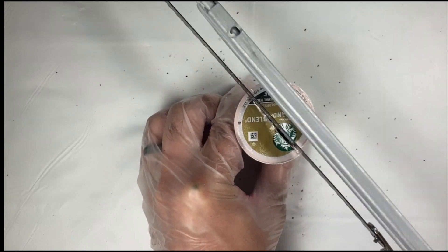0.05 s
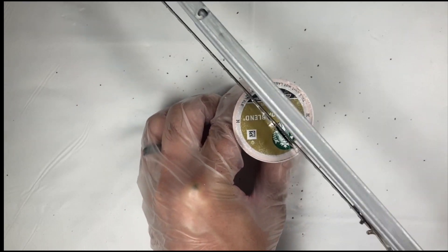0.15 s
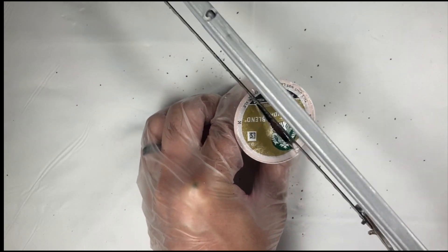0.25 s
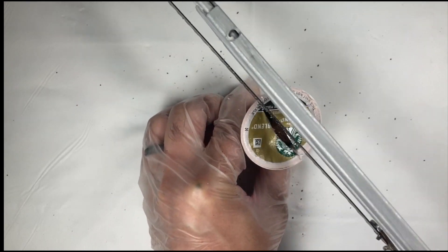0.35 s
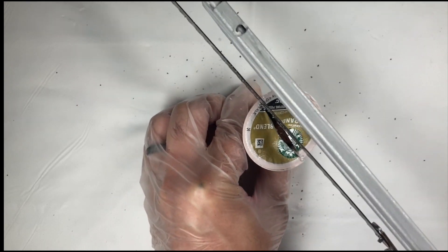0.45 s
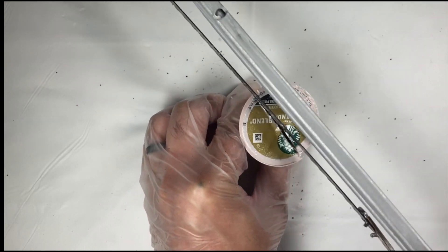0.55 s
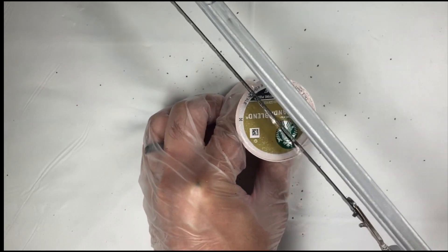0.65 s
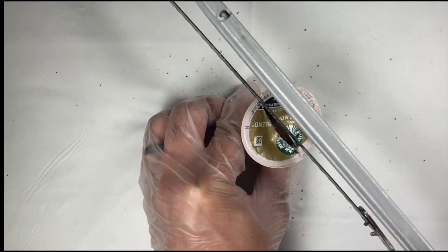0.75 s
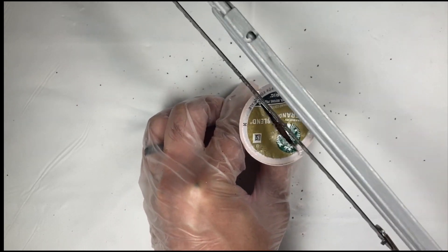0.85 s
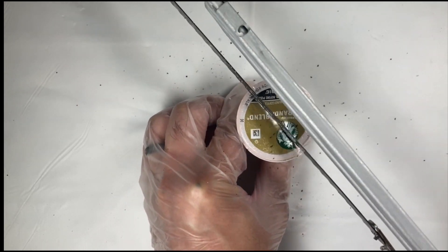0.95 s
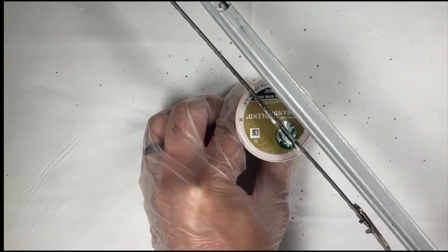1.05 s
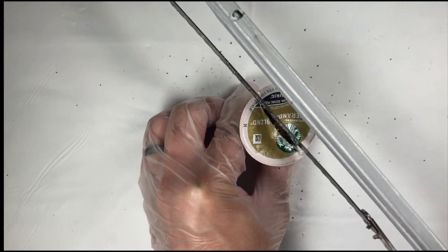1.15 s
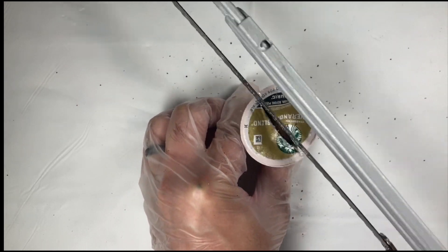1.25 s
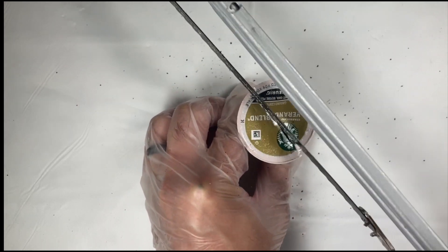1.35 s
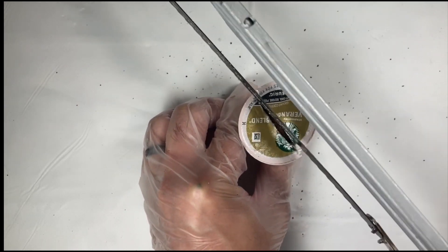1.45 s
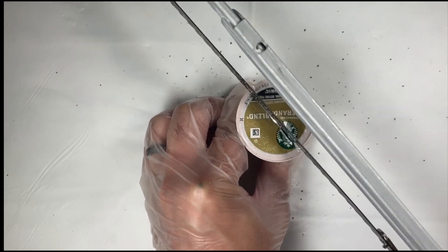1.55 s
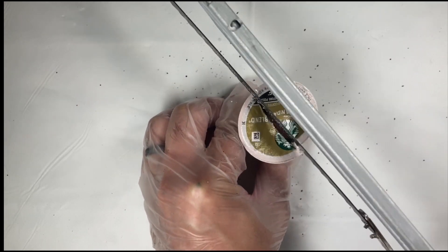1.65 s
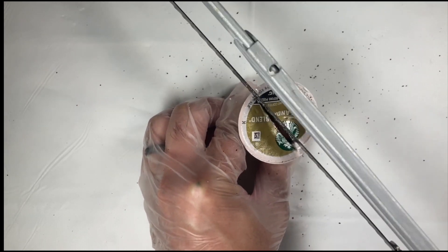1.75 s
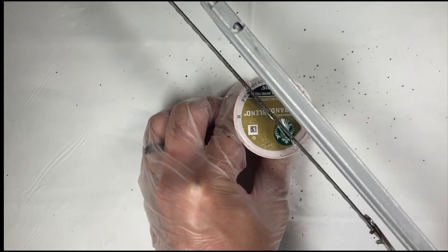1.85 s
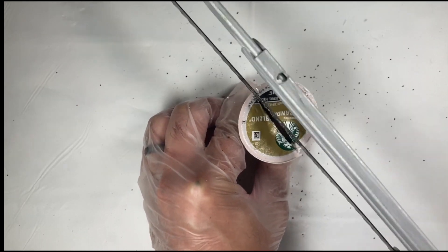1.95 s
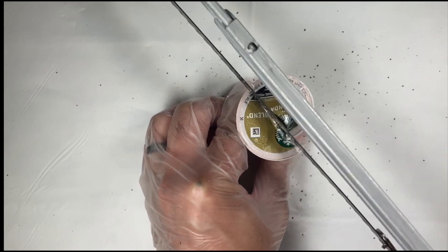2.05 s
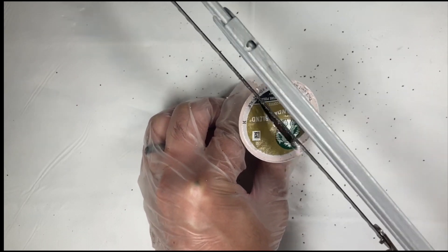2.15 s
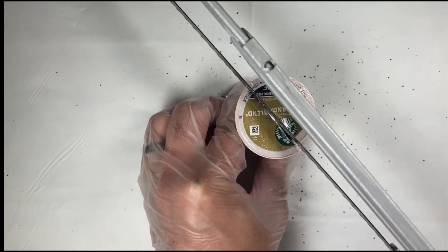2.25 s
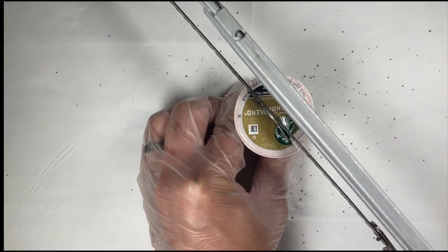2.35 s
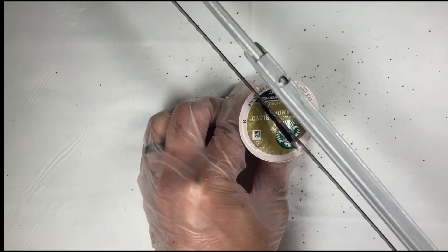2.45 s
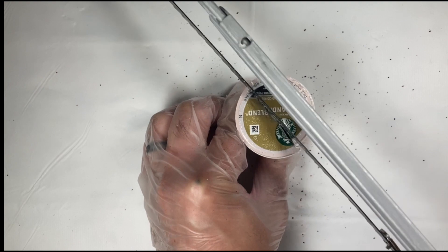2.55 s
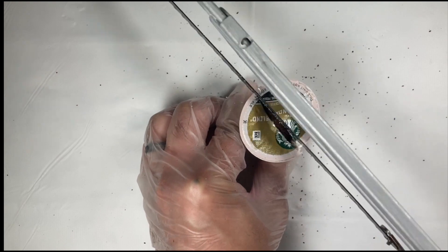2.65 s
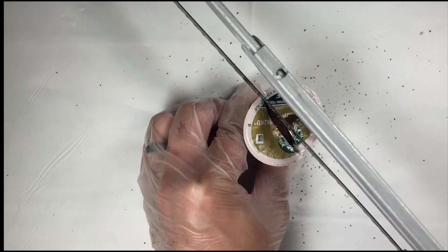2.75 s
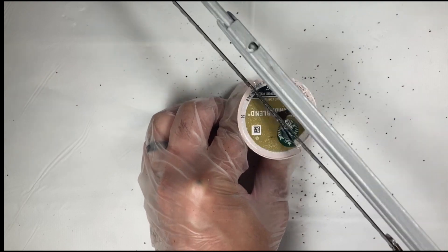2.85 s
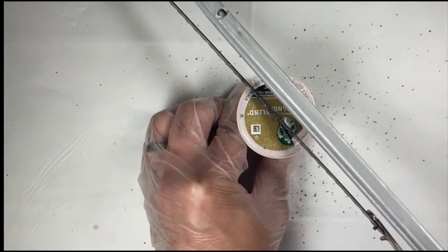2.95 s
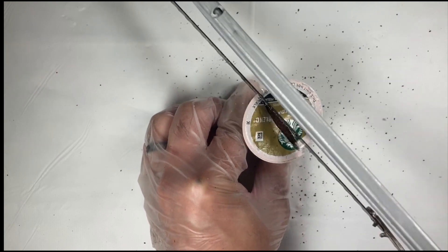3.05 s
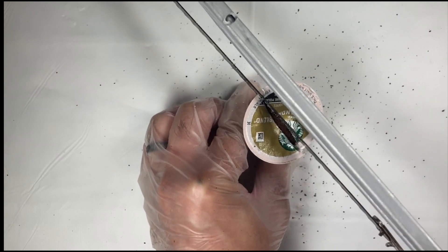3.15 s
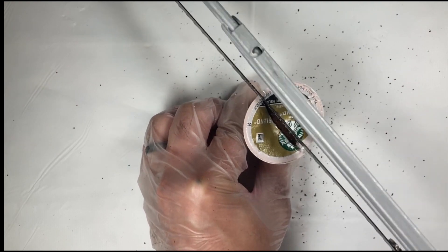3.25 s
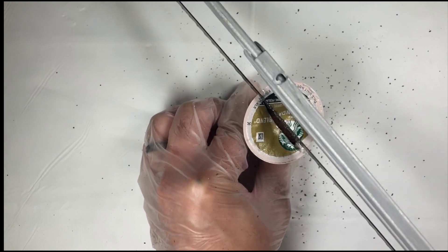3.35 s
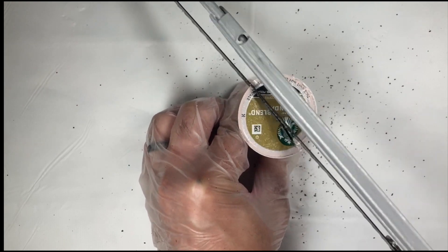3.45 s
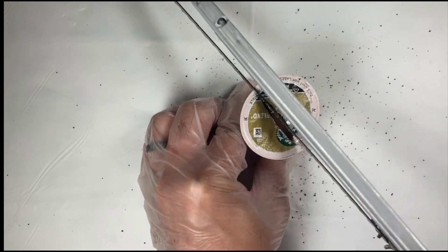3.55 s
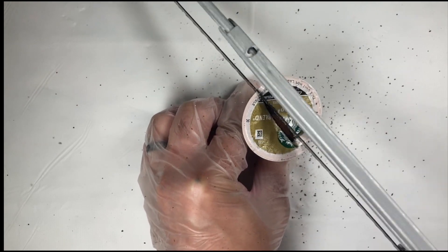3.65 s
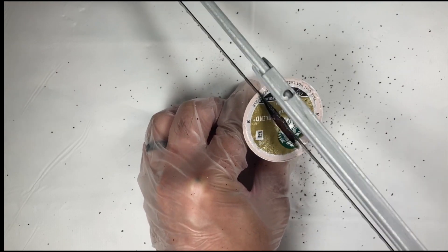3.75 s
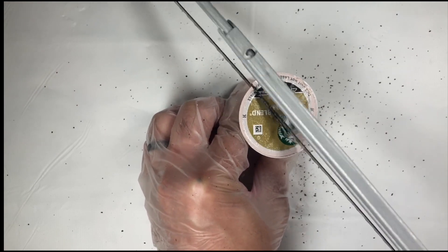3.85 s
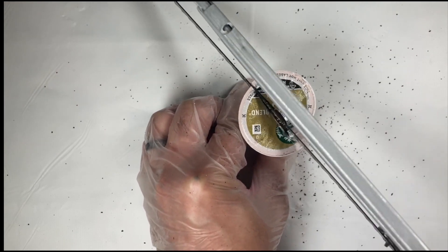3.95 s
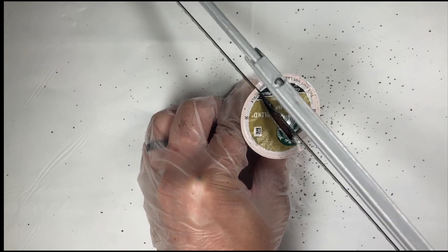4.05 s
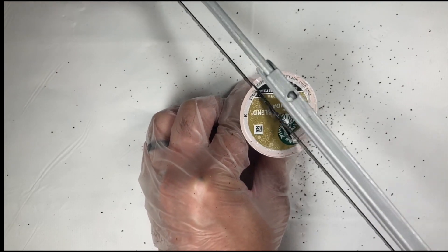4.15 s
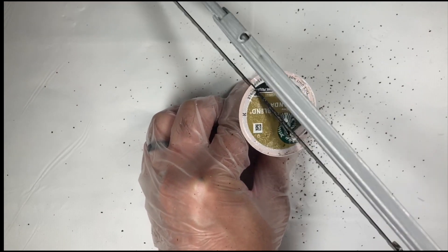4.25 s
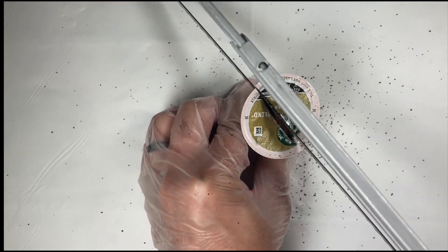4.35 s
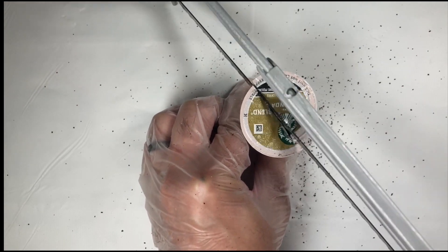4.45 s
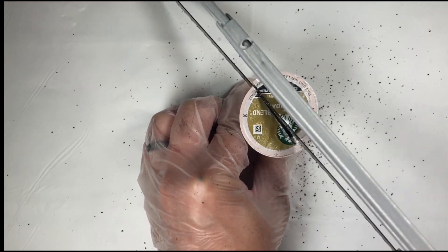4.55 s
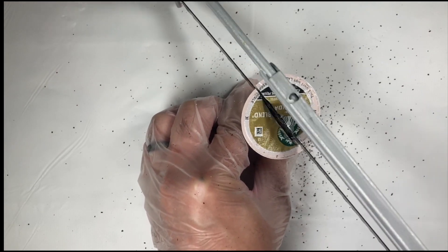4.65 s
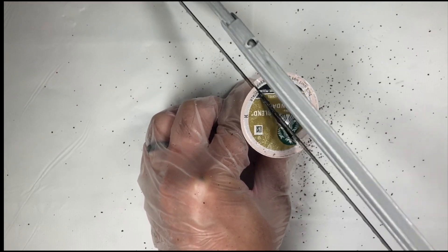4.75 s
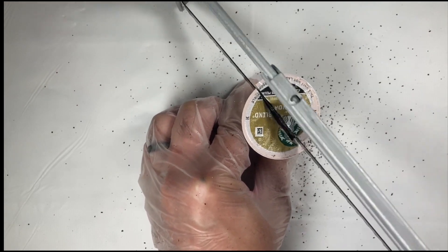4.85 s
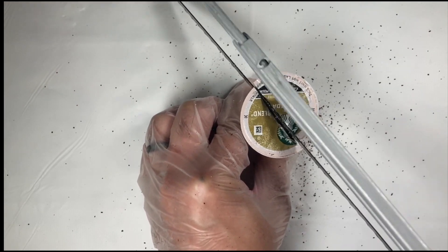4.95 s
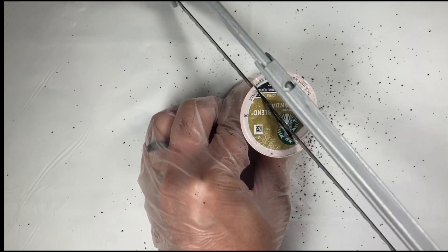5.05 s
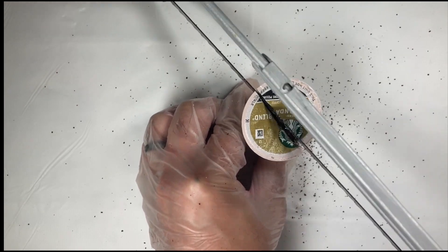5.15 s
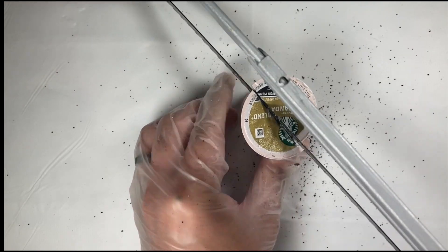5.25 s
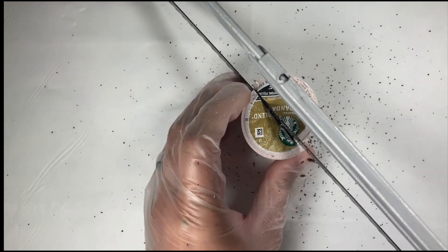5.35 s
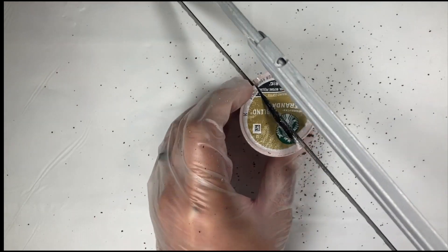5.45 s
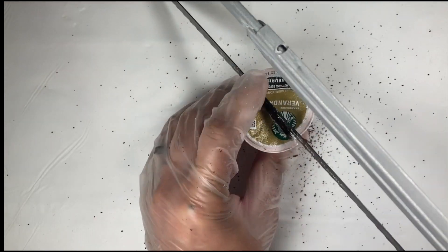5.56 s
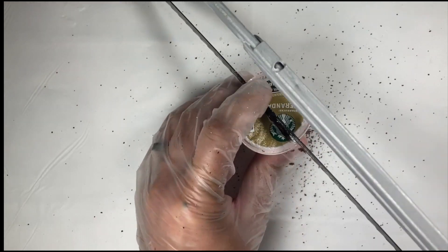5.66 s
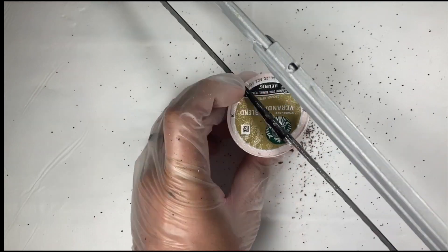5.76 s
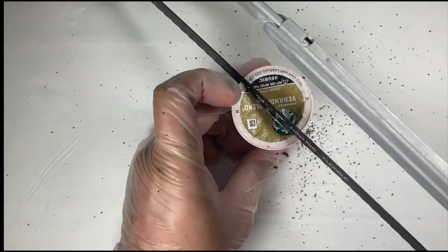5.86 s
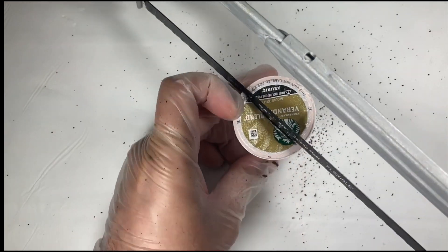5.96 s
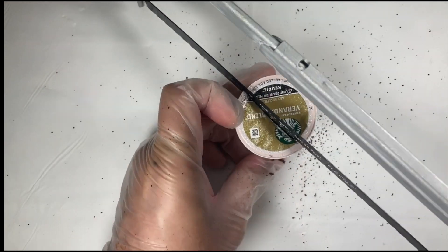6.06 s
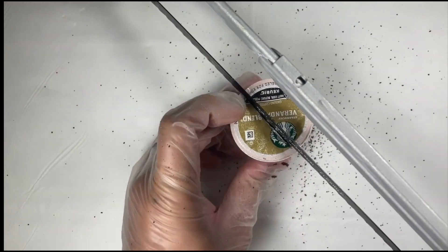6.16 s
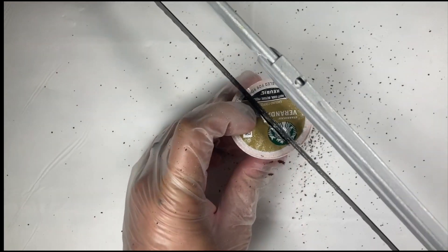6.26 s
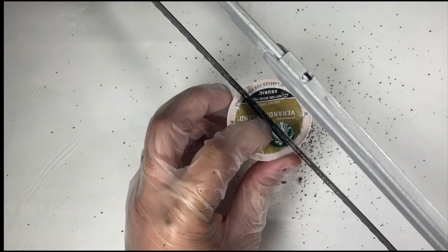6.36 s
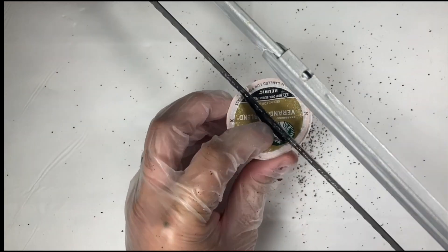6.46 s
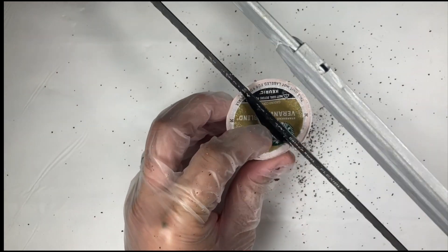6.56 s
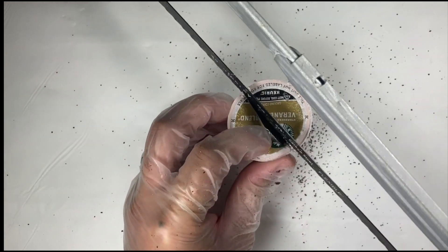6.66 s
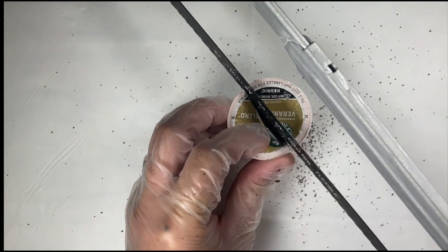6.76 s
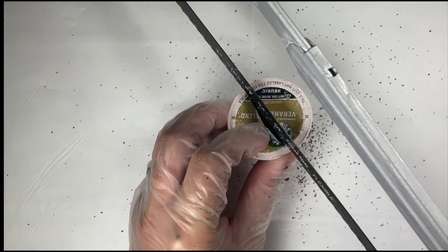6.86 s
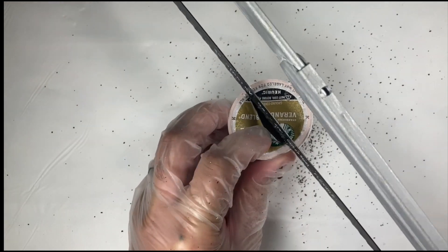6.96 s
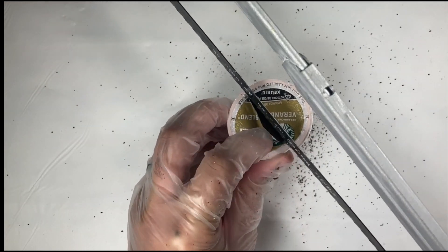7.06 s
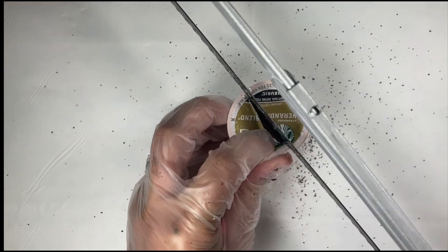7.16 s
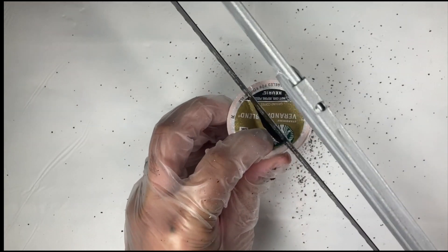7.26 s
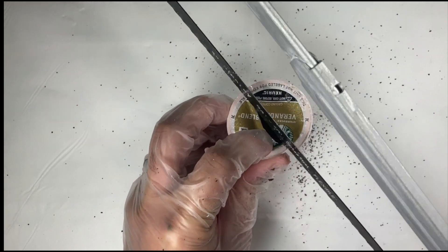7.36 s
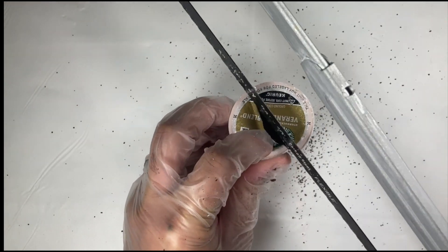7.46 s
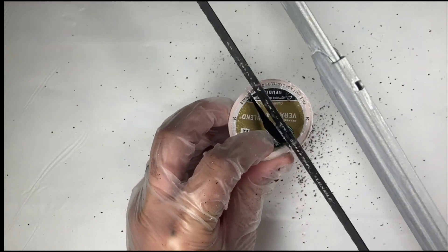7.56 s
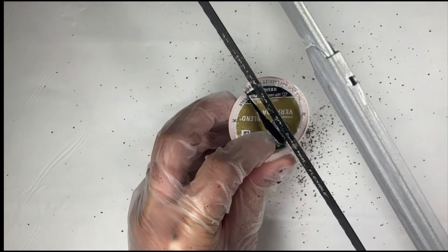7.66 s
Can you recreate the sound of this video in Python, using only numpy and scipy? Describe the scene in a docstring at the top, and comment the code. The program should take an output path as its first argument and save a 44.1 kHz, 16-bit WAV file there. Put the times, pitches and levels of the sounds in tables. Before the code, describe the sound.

Raspy back-and-forth sawing through thin hollow plastic, close stereo microphones, short room echo. It starts with a stuttering drag and low table thumps, then crackling, buzzy strokes about eight a second, full of brittle snaps. After five seconds it ends abruptly; much quieter film-like glove crinkling, a dull knock near six seconds and several tiny blade ticks and scrapes follow over soft room hum.

```python
"""Sawing a coffee pod

A hand hacksaw works back and forth through a small plastic pod of coffee grounds, held on a table by a gloved hand.
Each stroke is a run of tooth ticks over rubbing noise, and now and then a snagged tooth snaps free.
Kicks and short bursts of noise pass through the resonances of cup wall, lid, rim and blade.
After five seconds the sawing stops, the glove shifts its grip with rustling noise,
and the blade is set lightly on the lid again. The table rumbles, and a small room adds echoes, hum and hiss."""
import sys
import numpy as np
from scipy import signal
from scipy.fft import rfft, irfft, next_fast_len
from scipy.io import wavfile
from scipy.ndimage import uniform_filter1d, map_coordinates

SR = 44100
rng = np.random.default_rng(int(sys.argv[2]) if len(sys.argv) > 2 else 0)


def transcribe(signal):
    """Save signal, clipped to [-1, 1], as a 16-bit WAV file at the path in sys.argv[1]."""
    frames = np.atleast_2d(signal).T
    limited = np.clip(frames, -1, 1)
    pcm = np.round(limited * 32767).astype(np.int16)
    wavfile.write(sys.argv[1], SR, pcm)


N = 339570
TIME = np.arange(N) / SR
# frequencies [Hz] at which every filter is drawn
GRID = np.maximum(np.fft.rfftfreq(4096, 1 / SR), 1)

# saw strokes, level before the shares below: (start [s], speeding up [s], slowing down [s], level [dB],
#   tooth catches at top speed [per s], cup wall [dB], lid pitch [Hz], lid [dB], rim pitch [Hz], rim [dB])
STROKES = [(-0.17, 0.25, 0.05, -31.5, 132, 2.5, 1390, 6.5, 2900, -4),
           (0.485, 0.016, 0.092, -33, 185, 5, 800.0, -0.5, 2390, -2),
           (0.72, 0.076, 0.051, -38.5, 158, 0.5, 1280.0, -0.5, 2690.0, -3.0),
           (0.945, 0.039, 0.051, -26.5, 450, 1, 1470.0, 6.5, 3400, 5),
           (1.148, 0.011, 0.02, -38, 270, 9.5, 889.8, -8.5, 2309, 4.5),
           (1.177, 0.026, 0.038, -45, 170, 2.5, 1530.0, 3.5, 3170, -2.5),
           (1.266, 0.027, 0.063, -21.5, 502, 0.5, 800.0, 1.5, 2402, 1.5),
           (1.392, 0.069, 0.036, -32, 164, 1.5, 1550.0, -1, 3300, -5.5),
           (1.514, 0.025, 0.05, -26, 530, 2, 800.0, -1.5, 2530.0, 2.5),
           (1.616, 0.023, 0.026, -29, 482, 1, 1340.0, -11, 3242, -9.5),
           (1.753, 0.023, 0.074, -22.5, 490, 2.5, 1109, 5.5, 2980, 4.5),
           (1.875, 0.063, 0.026, -35.5, 252, 5.5, 800.0, -3.5, 2411, 4.5),
           (2, 0.014, 0.038, -23.5, 467, 1.5, 810.0, -3.0, 2880, 3),
           (2.03, 0.053, 0.015, -33.0, 710, 4.5, 880.0, -4.5, 3350, 9),
           (2.114, 0.049, 0.073, -45.0, 93, -1, 810.0, 4.5, 2480.0, 2),
           (2.239, 0.028, 0.076, -22, 547, 2, 800.0, -3, 2574, 4.5),
           (2.385, 0.024, 0.07, -40.5, 121, -2.5, 800.0, 4, 3233, 1),
           (2.488, 0.024, 0.099, -25, 580, 1, 1149, 3, 2550, 7),
           (2.636, 0.03, 0.046, -32, 427, 0.5, 1270.0, 4, 2618, 0.5),
           (2.829, 0.024, 0.13, -27, 426, 0, 1040.0, 4, 2486, 2.5),
           (2.985, 0.028, 0.029, -39, 360, -8, 969.3, 11.5, 3280.0, -3),
           (3.052, 0.02, 0.026, -39.5, 434, 6.5, 1541, 5.5, 3273, 5.5),
           (3.125, 0.13, 0.097, -34.5, 227, -2, 800.0, 4, 2913, 8.5),
           (3.37, 0.045, 0.078, -23, 555, -4, 950.0, 6.5, 3316, 2),
           (3.52, 0.024, 0.087, -26.5, 490, 1, 1529, 2, 2696, 6.5),
           (3.592, 0.11, 0.055, -33.5, 211, -1.5, 800.0, 2.5, 2848, 7.5),
           (3.783, 0.026, 0.11, -24, 517, -2, 1021, 6.5, 2418, 8),
           (3.924, 0.044, 0.15, -26, 497, 1.5, 1551, 2, 2570, 6),
           (4.14, 0.042, 0.091, -25, 510, 0.5, 1501, -6, 3190.0, -4),
           (4.265, 0.067, 0.085, -26, 380, -3, 980.0, -2.5, 2509, 7.5),
           (4.415, 0.07, 0.034, -26, 390, -2, 1340.0, -6.5, 3299, -2.5),
           (4.556, 0.034, 0.064, -27, 650, 0.5, 1549, 4, 2458, 8.5),
           (4.653, 0.064, 0.029, -27.5, 740, -3, 810.0, 3, 2530, 1),
           (4.756, 0.029, 0.06, -28, 580, -0.5, 929.6, -2, 2509, 6),
           (4.845, 0.034, 0.039, -23, 645, -4.5, 1359, -4, 2103, 2),
           (4.943, 0.028, 0.045, -26, 710, -0.5, 1188, -1, 2459, 7),
           (5.01, 0.034, 0.056, -29.5, 670, -1.0, 1309, -5, 3010.0, 0.5),
           (5.498, 0.024, 0.052, -53.5, 290, 0.0, 929, 1, 2570.0, 8.5),
           (5.625, 0.032, 0.041, -48.5, 510, -7, 1250.0, -11, 2804, -1),
           (5.759, 0.027, 0.024, -40.5, 210, 0.5, 800.0, 4.5, 2100.0, -5),
           (5.903, 0.019, 0.049, -42.5, 225, -3.5, 1548, 6, 2450.0, 4),
           (6.35, 0.019, 0.041, -57.5, 313, 2, 1130.0, 4, 2220.0, -5),
           (6.455, 0.012, 0.036, -54.5, 290, 0, 1059, -7, 3600, 9),
           (6.509, 0.024, 0.018, -50, 304, -0.5, 1340.0, -1.5, 2504, 6),
           (7.165, 0.02, 0.031, -59, 250, 3, 941, -4, 2277, 4),
           (7.319, 0.02, 0.029, -36.5, 400, -3, 800.0, -6.5, 2076, 0),
           (7.448, 0.018, 0.036, -48.5, 260, -1, 900, 9, 2100.0, 0),
           (7.495, 0.0084, 0.018, -45.5, 236, 0.5, 800.0, -1, 2980.0, 3),
           (7.52, 0.013, 0.02, -45.5, 280, -3, 950, 3, 2652, -3.0),
           (7.56, 0.032, 0.035, -53, 280, -3, 950, 2, 2777, 6),
           (7.675, 0.02, 0.018, -51.5, 240, -1, 1427, 4, 2453, 7)]
# how a stroke feeds cup wall, lid, rim, blade; a faster one is thinner and brighter:
#   (share at the usual speed [dB], change [dB per doubling of speed])
STROKE_SHARES = [(-4.3, -5), (-3, -1.5), (0.13, -0.06), (-1.8, 4)]
USUAL_CATCHES_PER_S = 400
# loud snaps of a snagged tooth or of the blade landing, level before the shares below:
#   (time [s], level [dB], hardness as treble over bass [dB])
SNAPS = [(.1055, -31.5, -9), (.1262, -31, -7.5), (0.1978, -50.5, 21), (0.2454, -29, -9), (0.2554, -35.5, 0),
         (.473, -45.5, 11.5), (0.4957, -34, -6), (0.5376, -29, 11.5), (0.56, -25.5, 2), (0.7397, -29.5, -5),
         (.777, -35, 7), (0.8108, -24.5, 2.5), (0.8406, -24.5, 1.5), (.927, -18, 2.5), (0.9354, -22, 0.5),
         (0.9435, -20, -1), (0.968, -19.5, 2.5), (0.974, -19.5, 3.5), (.979, -19.5, 3.5), (1.1575, -28, -8),
         (1.1976, -40.5, -6.5), (1.3672, -26, -1.5), (1.4114, -31.5, -5.5), (1.451, -31, -7),
         (1.487, -37, 0.5), (1.539, -21.5, -3.5), (1.5658, -23, 6.5), (1.8095, -25.5, 4.5),
         (1.898, -31, -5.5), (1.92, -32.5, 3), (1.929, -36, 1), (2.01, -21.5, 3), (2.059, -36.5, 30),
         (2.0788, -31, 21), (2.1395, -38.5, -5.5), (2.3022, -24.5, 5.5), (2.311, -26, 6), (2.3459, -33, 1),
         (2.3922, -30, -6.5), (2.4156, -33.5, -6), (2.5105, -25, 6.5), (2.524, -24, 4),
         (2.5569, -21.5, -3.5), (2.5645, -21, 1.5), (2.594, -38.5, 1), (2.652, -31.5, 6),
         (2.6657, -25, 3.5), (2.8535, -22.5, 7), (2.8845, -24, -1), (2.913, -24, 3.5), (2.922, -22, 2.5),
         (2.811, -46, -5.5), (3.006, -34.5, 1), (3.0132, -26.5, -5), (3.1594, -40, -12.5),
         (3.211, -36.5, -5), (3.234, -30, -0.5), (3.0773, -30, 7), (3.2463, -31.5, -6), (3.263, -32, -1.5),
         (3.2792, -29.5, -5), (3.3199, -24.5, -1), (3.446, -26, -1), (3.4541, -23, 1), (3.5738, -26, 1),
         (3.602, -34, -1.5), (3.644, -31.5, -0.5), (3.6824, -32, -2), (3.723, -35, -4), (3.834, -29.5, 3),
         (3.849, -29, -1), (3.8822, -26.5, 5), (3.9406, -27, 8.5), (3.9628, -24.5, 9), (3.97, -24, 2.5),
         (3.979, -25, 10.5), (4.047, -30, 1.5), (4.1262, -36, 5.5), (4.195, -20.5, 7.5), (4.2242, -23, 9.5),
         (4.29, -22.5, 7.5), (4.3, -29, 6.5), (4.326, -29.5, 6.5), (4.3476, -30, -0.5),
         (4.4416, -26.5, 11.5), (4.501, -28.5, 12), (4.5684, -28, 4), (4.674, -22, 8.5),
         (4.7009, -25.5, 19), (4.774, -28.5, 5), (4.861, -23.5, 13), (4.885, -24.5, 8.5), (4.9615, -24, 6),
         (5.051, -31, 22.5), (5.49, -54, -13), (5.6164, -43, 10.5), (5.643, -53, 14), (5.7081, -48.5, 20),
         (5.7672, -48, 20), (5.93, -31.5, -6.5), (6.145, -50.5, -7), (6.368, -49.5, 10), (6.418, -64, 18),
         (6.75, -61, 10), (6.5296, -43.5, 2.5), (6.7764, -47.5, -1), (6.928, -52.5, -2.5),
         (7.1818, -52.5, -2), (7.467, -49, -3), (7.5, -46, 8), (7.5684, -39, -4), (7.6047, -33.5, 4),
         (7.6939, -40.5, -8)]
# how a snap feeds cup wall, lid, rim, blade; a hard one rings the blade, a soft one the cup:
#   (share [dB], change [dB per dB of hardness])
SNAP_SHARES = [(-1.5, -0.76), (-1.7, -0.1744), (1.1, 0.1067), (-3, 0.6335)]
# lesser snags come by chance: how often, and how strong beside the stroke
SNAGS_PER_S, SNAG_DB = 14, -5
# spread of a tooth's strength from part to part, and from tooth to tooth
PART_SCATTER_DB, TOOTH_SPREAD_DB = 1.5, 2
# unevenness of tooth spacing: large in a free cut, small when the blade judders
CUT_JITTER, JUDDER_JITTER = .35, .07
# below this catch rate the blade judders instead of cutting freely, and how sharply that changes
JUDDER_PER_S, JUDDER_SHARPNESS = 254, 8
# share of the rasp that comes as separate ticks while the blade judders
JUDDER_BITE = .88

# radiating parts, cup wall, lid, rim, blade: (low edge [Hz], high edge [Hz], share in the first kick [0-1],
#   decay of a snap's crunch by 60 dB [s], left-right likeness [0-1], lag of right ear [s])
PARTS = [(40.1, 828, .8, 0.028, 0.7, -.00025), (800, 1564, 0.49, 0.028, 0.36, -.00015),
         (1760, 3900, .4, .021, 0.3, .00005), (4160, 47000, 0, .015, 0.72, .000122)]
# colour of pod and saw together: (frequency [Hz], relative level [dB])
SAW_COLOUR = [(50, -25), (150, -23), (250, -11), (400, -5.5), (650, -4), (1000, -2), (1650, -7.5),
              (2600, -2.5), (3800, -8.5), (6800, -11.5), (9300, -7), (11700, -18), (13200, -14.5),
              (15800, -25.5)]
# resonances while the teeth cut freely: (frequency [Hz], width [Hz], height [dB])
MODES_CUT = [(461.4, 32, 4.5), (590, 59, 6.5), (689.5, 110, 9), (843, 41, 5.5), (1111, 120, 6),
             (1270, 120, 8), (1490, 220, 2.5), (1930, 26, 4), (2980, 280, 1), (4640, 680, 2.5)]
# resonances while the blade judders and shakes the whole pod: (frequency [Hz], width [Hz], height [dB])
MODES_JUDDER = [(443, 160, 4), (600, 80, 5), (674, 90, 6), (880, 190, -6.5), (1072, 84, 4),
                (1330, 210, 2.5), (2010, 360, -1), (2464, 220, 5), (2980, 200, 3), (4060, 260, -0.5)]
# resonances while the blade only rests on the lid: (frequency [Hz], width [Hz], height [dB])
MODES_REST = [(437, 143, -18.5), (683.8, 160, -3.5), (920, 260, 3.5), (1520, 250, -1), (2550, 600, 0.5),
              (5602, 348, -2.5)]
SAWING_ENDS_S = 5.3
# the cup wall sounds mostly below the first; lid and rim each ring in a band of their width
CUP_TOP_HZ, LID_WIDTH_HZ, RIM_WIDTH_HZ = 640, 320, 500
# a bending wave of this frequency takes this long to spread from the cut
BEND_HZ, BEND_S = 1000, .0016
# echo from the blade's clamp: usual delay, its relative swing as the saw travels, strength [0-1]
CLAMP_ECHO_S, CLAMP_TRAVEL, CLAMP_SHARE = .0018, .15, .35
# left ear against right: (frequency [Hz], left minus right [dB])
BALANCE_DB = [(100, -3.5), (400, 1), (700, 2.5), (1200, -6), (1800, -1), (2600, -5), (3300, -5.5),
              (4300, 0), (6000, 0), (15000, -1)]
# extra top octave at the start, the time over which it fades, and where it begins
SIZZLE_DB, SIZZLE_FADES_S, SIZZLE_HZ = 5.5, 5.4, 12000

# the glove slides on the pod: (start [s], length [s], level [dB])
RUBS = [(5.069, 0.087, -61), (5.481, 0.08, -48.5), (5.598, 0.29, -51), (5.839, 0.17, -55.5),
        (6.011, 0.12, -51), (6.198, 0.18, -52.5), (6.501, 0.051, -66), (6.616, 0.07, -58),
        (6.733, 0.16, -54), (6.906, .035, -52.5), (7.31, 0.067, -46), (7.368, 0.29, -49.5)]
# colour of the glove's plastic film: (frequency [Hz], relative level [dB])
GLOVE_COLOUR = [(300, -11.5), (900, -4), (2500, 0), (4200, 2), (6000, -4.5), (9000, 0.5), (12000, -9),
                (15000, -4.5)]
# faint rustle of the gripping glove: level, how long it takes to fade, and when the hand has come to rest
GRIP_DB, GRIP_FADES_S, HAND_RESTS_S = -61, 0.49, 7.05
# share of the glove's sound that comes as separate crinkles
CRINKLE_SHARE = .65

# lowest mode of the table
TABLE_HZ = 72
# the jerking saw rocks the table: (time [s], peak [dB], swelling [s])
JOLTS = [(0.265, -37, .025), (0.772, -39, .024), (0.84, -37, .026), (1.195, -45, .012), (1.905, -42, .01),
         (3.24, -51, .012), (6.77, -53, .015)]
# the table's rumble under the hands: (time [s], level [dB])
RUMBLE = [(0, -48), (.25, -51), (.55, -56), (.65, -62.5), (1, -63.5), (2.1, -66.5), (3.6, -68),
          (4.3, -82.5)]

# colour of the room hum: (frequency [Hz], relative level [dB])
HUM_COLOUR = [(15, -41), (25, -12), (64, -3.5), (165, -2), (266, 3.3), (338, -7), (368, -10.5),
              (585, -11.5), (782, -14), (945, -16), (1500, -25), (1950, -46.5), (3300, -120)]
# level of the hum before its slow changes
HUM_DB = -59
# the room's tail: (time [s], level [dB])
LINGER = [(0, -13), (1.7, -17), (2.75, -24), (4, -16.5), (5.2, -24.5), (7.7, -18.5)]
# colour of the echoes: (frequency [Hz], gain [dB])
ROOM_COLOUR = [(100, 2.5), (500, 0.5), (1500, 2), (4000, 1), (9000, -4.5), (16000, -11.5)]
ROOM_T60_S = 0.43
# the sound drops out: (from [s], to [s])
DROPOUT = (1.175, 1.197)
CUTOFF_HZ = 15800


def from_db(db):
    """Turn decibels into a gain."""
    return 10 ** (np.asarray(db) / 20)


def on_grid(points):
    """Turn a table of frequencies and decibels into gains on the frequency grid."""
    hz, db = np.transpose(points)
    return from_db(np.interp(np.log(GRID), np.log(hz), db))


def unit(gains):
    """Scale a filter so that white noise keeps its power."""
    return gains / np.sqrt(np.mean(gains ** 2))


def resonances(modes):
    """Draw gains with a peak or dip for each resonance."""
    return from_db(sum(db / (1 + (2 * (GRID - hz) / width) ** 2) for hz, width, db in modes))


def filtered(x, gains):
    """Filter with these gains, answering at once and never ahead of the sound (minimum phase)."""
    cepstrum = irfft(np.log(gains + 1e-6))
    half = len(cepstrum) // 2
    # folding the cepstrum forward gives the minimum-phase response
    cepstrum[1:half] *= 2
    cepstrum[half + 1:] = 0
    response = irfft(np.exp(rfft(cepstrum)))
    return np.apply_along_axis(lambda row: signal.oaconvolve(row, response)[:N], -1, x)


def late(x, delay_s):
    """Shift each frequency's phase by its own delay, given as a function of Hz."""
    size = next_fast_len(N + SR // 10)
    hz = np.maximum(np.fft.rfftfreq(size, 1 / SR), 1)
    turned = rfft(x, size) * np.exp(-2j * np.pi * hz * delay_s(hz))
    return irfft(turned, size)[..., :N]


def stereo_noise(likeness, lag_s=0):
    """Make white noise at two ears, partly shared, with the shared part later on the right."""
    shared, left, right = rng.standard_normal((3, N))
    common = np.array([shared, late(shared, lambda hz: lag_s)])
    return np.sqrt(likeness) * common + np.sqrt(1 - likeness) * np.array([left, right])


def wobble(time_s):
    """Drift slowly by chance with spread 1; after its 4000 points it holds its last value."""
    slow = signal.lfilter([1], [1, -.8], rng.standard_normal(4000))
    return np.interp(TIME * 5 / time_s + 50, np.arange(len(slow)), slow / slow.std())


def die_away(energy, t60):
    """Spread each parcel of energy over an exponential decay."""
    keep = 10 ** (-6 / (t60 * SR))
    return signal.lfilter([1 - keep], [1, -keep], energy + 1e-18)


def catches(per_s, jitter, spread_db):
    """Make unevenly spaced, unevenly strong parcels of energy with a mean power near 1."""
    pace, strength = np.clip(rng.standard_normal((2, 8000)), -2, 2)
    turn = (np.cumsum(per_s) / SR).astype(int)
    uneven_rate = per_s * np.exp(jitter * pace[turn] - jitter ** 2 / 2)
    count = (np.cumsum(uneven_rate) / SR).astype(int)
    size = from_db(spread_db * strength[count]) ** 2
    return np.diff(count, prepend=0) * size / size.mean() * SR / per_s


def strokes(bell, slowest):
    """Feed power to each part and set the catch rate as the hand speeds up and slows down."""
    power, per_s, top_rate = np.zeros((len(PARTS), N)), np.full(N, 40.), np.zeros(N)
    usual_db, speed_db = np.transpose(STROKE_SHARES)[:, :, None]
    for start, rise_s, fall_s, level_db, rate, *_ in STROKES:
        turns = start + np.cumsum([0, rise_s, fall_s])
        now = slice(*np.searchsorted(TIME, turns[::2]))
        speed = np.abs(np.sin(np.interp(TIME[now], turns, [0, np.pi / 2, np.pi])))
        part_db = level_db + usual_db + speed_db * np.log2(rate / USUAL_CATCHES_PER_S)
        power[:, now] += (from_db(part_db) * speed ** bell) ** 2
        per_s[now] = rate * np.maximum(speed, slowest)
        # the top rate of the latest stroke stays until the next one
        top_rate[now.start:] = rate
    return power, per_s, top_rate


def juddering(top_rate):
    """Tell how far a slow stroke judders instead of cutting freely, from 0 to 1."""
    return 1 / (1 + (top_rate / JUDDER_PER_S) ** JUDDER_SHARPNESS)


def contacts(top_rate):
    """Describe how the blade bears on the pod, as pairs of (share over time, resonant response)."""
    resting = 1. * (TIME > SAWING_ENDS_S)
    judder = (1 - resting) * juddering(top_rate)
    kinds = [(resting, MODES_REST), (judder, MODES_JUDDER), (1 - resting - judder, MODES_CUT)]
    return [(share, on_grid(SAW_COLOUR) * resonances(modes)) for share, modes in kinds]


def snaps(stroke_power, length_s):
    """Throw energy into each part as teeth come free: lesser snags by chance, then the loud snaps."""
    energy = stroke_power * from_db(SNAG_DB) ** 2 * (rng.random(N) < SNAGS_PER_S / SR)
    share_db, hardening = np.transpose(SNAP_SHARES)
    for time_s, level_db, hardness_db in SNAPS:
        part_db = level_db + share_db + hardening * hardness_db
        energy[:, min(round(time_s * SR), N - 1)] += from_db(part_db) ** 2
    return energy * length_s * SR


def along_blade(x):
    """Return each tick from the blade's clamp; the path changes as the saw travels, so the ring shifts."""
    delay_s = CLAMP_ECHO_S * np.exp(CLAMP_TRAVEL * wobble(time_s=.15))
    echo = np.array([map_coordinates(ear, [(TIME - delay_s) * SR], order=3) for ear in x])
    return (x + CLAMP_SHARE * echo) / np.hypot(1, CLAMP_SHARE)


def flexing(x):
    """Bend the shell anew each stroke: the cup wall is freed or damped, lid and rim ring at new pitches."""
    out = np.zeros_like(x)
    edges = [*np.searchsorted(TIME, [row[0] for row in STROKES]), N]
    for (*_, cup_db, lid_hz, lid_db, rim_hz, rim_db), first, last in zip(STROKES, edges, edges[1:]):
        cup = from_db(cup_db / (1 + (GRID / CUP_TOP_HZ) ** 4))
        lid_and_rim = resonances([(lid_hz, LID_WIDTH_HZ, lid_db), (rim_hz, RIM_WIDTH_HZ, rim_db)])
        rung = filtered(x[:, first:last], cup * lid_and_rim)
        # the ringing runs on into the next stroke
        out[:, first:first + rung.shape[1]] += rung[:, :N - first]
    return out


def sawing(stroke_db, snap_db, bite, tooth_t60, press_db, flicker_db, blade_grain):
    """Tick teeth over a bed of rubbing; each tick or snap sends a kick and a crunch into the resonances."""
    power, per_s, top_rate = strokes(bell=1.393, slowest=.8)
    judder = juddering(top_rate)
    jitter = CUT_JITTER + (JUDDER_JITTER - CUT_JITTER) * judder
    teeth = catches(per_s, jitter, spread_db=TOOTH_SPREAD_DB)
    snags = snaps(power * (1 - judder), length_s=0.0062)
    states = contacts(top_rate)
    pressure_db = press_db * wobble(time_s=.006)
    bite = bite + (JUDDER_BITE - bite) * judder
    force = 0
    for k, (low, high, kick, snap_t60, likeness, lag) in enumerate(PARTS):
        # the hand presses unevenly, and the shifting contact favours now one part, now another
        drive = power[k] * from_db(stroke_db + pressure_db + flicker_db * wobble(time_s=.01)) ** 2
        scatter = from_db(PART_SCATTER_DB * rng.standard_normal(N)) ** 2
        # the blade hisses more smoothly than the plastic
        ticking = bite * (blade_grain if k == len(PARTS) - 1 else 1)
        ticks = ticking * drive * teeth * scatter / scatter.mean()
        snapped = from_db(snap_db) ** 2 * snags[k]
        kicks = np.sqrt(kick * (ticks + snapped))
        crunch = (1 - kick) * (die_away(ticks, tooth_t60) + die_away(snapped, snap_t60))
        rubbing = (1 - ticking) * drive
        push = np.array([kicks, late(kicks, lambda hz: lag)])
        push = push + np.sqrt(crunch + rubbing) * stereo_noise(likeness, lag)
        band = 1 / np.sqrt((1 + (low / GRID) ** 8) * (1 + (GRID / high) ** 8))
        # resonances colour a part without making it louder
        gain = sum(share * np.sqrt(np.mean((band * response) ** 2)) for share, response in states)
        rung = filtered(push / gain, band)
        # the lid swings against wall and rim; rim and blade hear the echo along the steel
        if k == 0:
            force = force + rung
        elif k == 1:
            force = force - rung
        else:
            force = force + along_blade(rung)
    # low bending waves travel slowest, so each tick is a tiny falling chirp
    force = late(force, lambda hz: 2 * BEND_S * np.sqrt(BEND_HZ / hz))
    out = flexing(sum(filtered(force * share, response) for share, response in states))
    # lid and rim face the right ear
    tilt = on_grid(BALANCE_DB)
    left = np.sqrt(2 / (1 + tilt ** -2))
    return np.array([filtered(out[0], left), filtered(out[1], left / tilt)])


def sizzle(x):
    """Lift the top octave while the cut is still fresh, less and less as time goes on."""
    top = signal.sosfiltfilt(signal.butter(4, SIZZLE_HZ, "high", fs=SR, output="sos"), x)
    lift_db = SIZZLE_DB * np.clip(1 - TIME / SIZZLE_FADES_S, 0, 1)
    return x + top * (from_db(lift_db) - 1)


def glove(level_db, crinkles_per_s, crinkle_t60, patchy_db):
    """Slide and crinkle thin plastic film in rubs that swell and fade; each size of fold rustles alone."""
    rubs = sum(from_db(db) * np.sin(np.pi * np.clip((TIME - start) / length_s, 0, 1))
               for start, length_s, db in RUBS)
    grip = from_db(GRIP_DB) * np.clip((HAND_RESTS_S - TIME) / GRIP_FADES_S, 0, 1)
    level = from_db(level_db) * np.hypot(rubs, grip)
    crinkle = die_away(catches(np.full(N, crinkles_per_s), jitter=0.8, spread_db=2.0), crinkle_t60)
    grain = np.sqrt(1 - CRINKLE_SHARE + CRINKLE_SHARE * crinkle)
    sliding = level * grain * stereo_noise(0.56, .00012)
    folds, below = 0, 0
    # cut the noise into bands, one for each size of fold
    for hz in np.geomspace(1000, 18000, 9):
        upto = signal.sosfiltfilt(signal.butter(4, hz, fs=SR, output="sos"), sliding + 1e-18)
        folds = folds + (upto - below) * from_db(patchy_db * wobble(time_s=.02))
        below = upto
    return filtered(folds, unit(on_grid(GLOVE_COLOUR)))


def table(rumble_width_hz):
    """Swell each jolt into a few swings of the table, over the rumble kept up by the leaning hands."""
    swing = 0
    for start, db, swell_s in JOLTS:
        age = np.maximum(TIME - start, 0)
        swell = (age / swell_s * np.exp(1 - age / swell_s)) ** 2
        swing = swing + from_db(db) * swell * np.sin(2 * np.pi * TABLE_HZ * age)
    peak = 1 / (1 + (2 * (GRID - TABLE_HZ) / rumble_width_hz) ** 2)
    rumble = filtered(stereo_noise(.9), unit(peak))
    return swing + rumble * from_db(np.interp(TIME, *np.transpose(RUMBLE)))


def background(hiss_db, sawing_hum_db, waver_db):
    """Make a low, wavering room hum from noise, fainter during the sawing, and a faint hiss."""
    hum = from_db(HUM_DB) * filtered(stereo_noise(0.64), unit(on_grid(HUM_COLOUR)))
    change_db = np.interp(TIME, [5.2, 6.2], [sawing_hum_db, 0]) + waver_db * wobble(time_s=.12)
    return hum * from_db(change_db) + from_db(hiss_db) * stereo_noise(.3)


def echoes(x, t60, gap_s):
    """Smear the sound over a fading burst of noise that begins after a short gap, as many echoes would."""
    age = TIME[:SR]
    tail = rng.standard_normal((2, SR)) * from_db(-60 * age / t60) * (age > gap_s)
    tail = tail / np.sqrt(np.sum(tail ** 2, axis=1, keepdims=True))
    return signal.oaconvolve(x, tail, axes=1)[:, :N]


def room(x, early_db, early_t60):
    """Add close reflections from the table and a longer, blurred tail."""
    linger = from_db(np.interp(TIME, *np.transpose(LINGER)))
    early = from_db(early_db) * echoes(x, early_t60, gap_s=0.0046)
    wet = early + linger * echoes(x, ROOM_T60_S, gap_s=0.011)
    return filtered(wet, on_grid(ROOM_COLOUR))


def scene():
    """Bring saw, glove and table together in a small room."""
    saw = sawing(stroke_db=-1.0, snap_db=0, bite=0.65, tooth_t60=0.0082,
                 press_db=1.1, flicker_db=1.88, blade_grain=0.46)
    film = glove(level_db=0.0, crinkles_per_s=200.0, crinkle_t60=0.0092, patchy_db=3.5)
    near = sizzle(saw) + film
    far = background(hiss_db=-71.5, sawing_hum_db=-2.5, waver_db=1.2)
    return near + room(near, early_db=-13.0, early_t60=0.041) + table(rumble_width_hz=64) + far


def record(dry):
    """Drop the sound out for an instant, round the tallest peaks and cut the top."""
    sounding = 1. * ((TIME < DROPOUT[0]) | (TIME > DROPOUT[1]))
    # soften the edges of the gap over 40 samples
    live = uniform_filter1d(sounding, size=40)
    rounded = live * dry / (1 + (dry / .8) ** 4) ** .25
    return signal.sosfilt(signal.ellip(12, .1, 80, CUTOFF_HZ, fs=SR, output="sos"), rounded)


dry = scene()
out = record(dry)
transcribe(out)
```